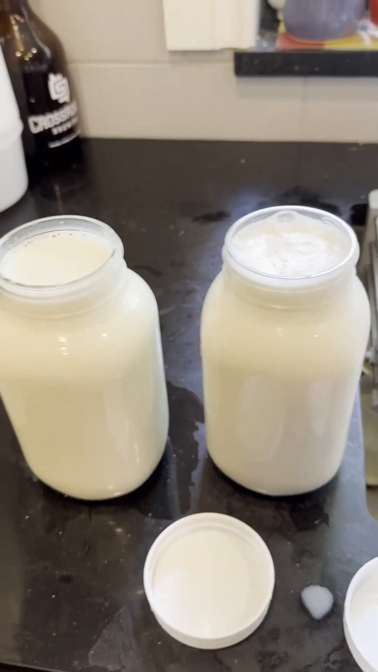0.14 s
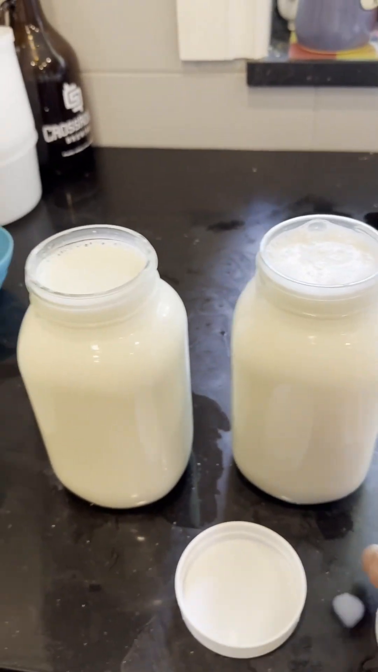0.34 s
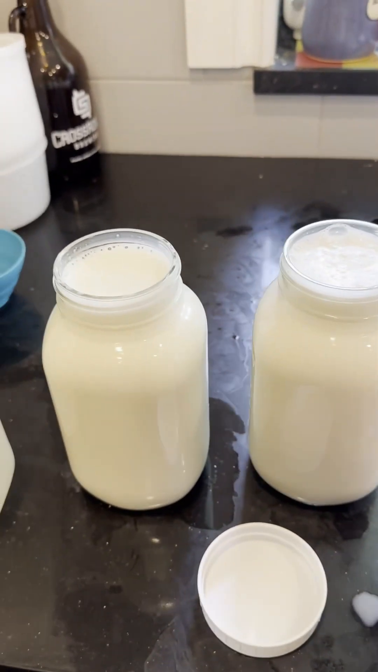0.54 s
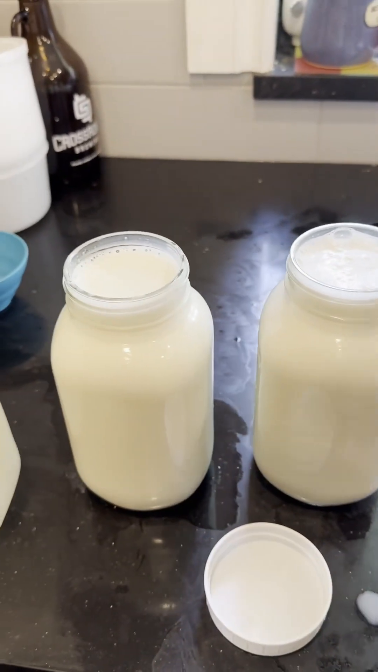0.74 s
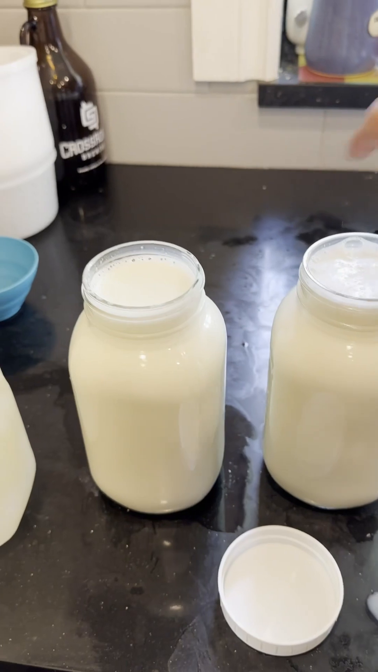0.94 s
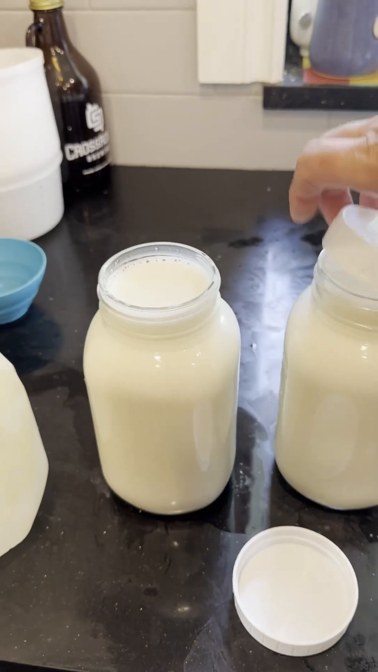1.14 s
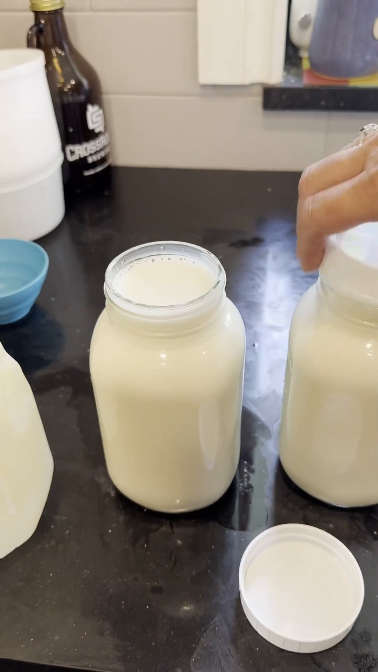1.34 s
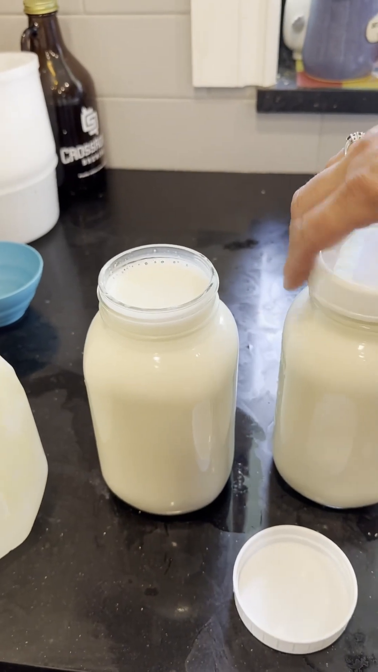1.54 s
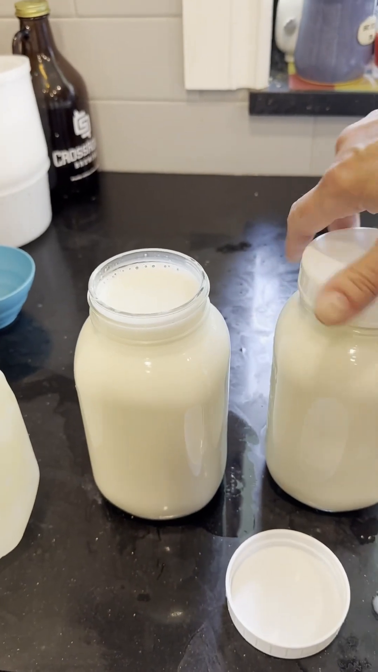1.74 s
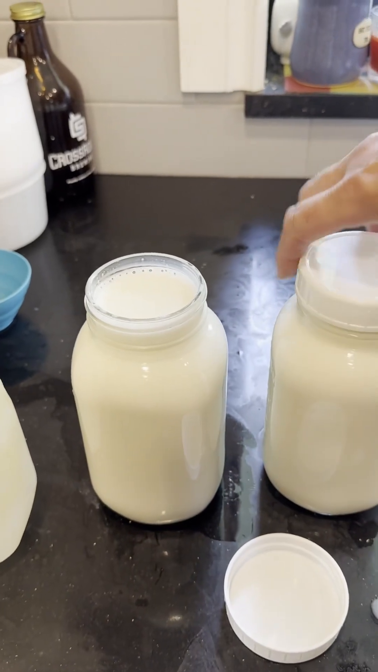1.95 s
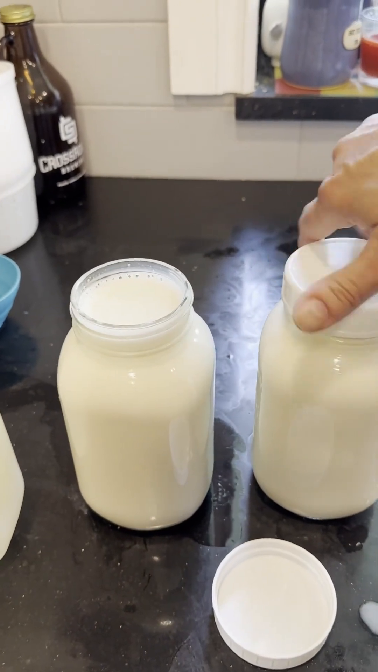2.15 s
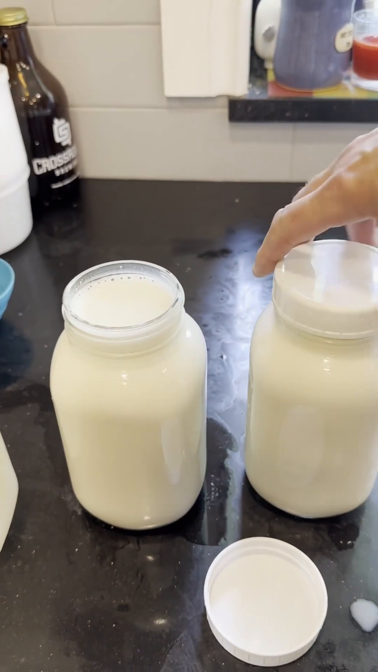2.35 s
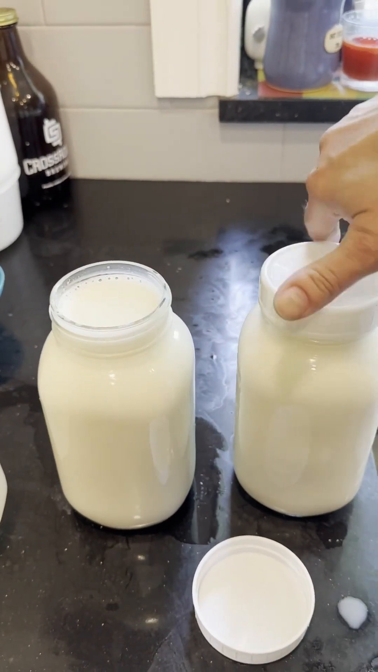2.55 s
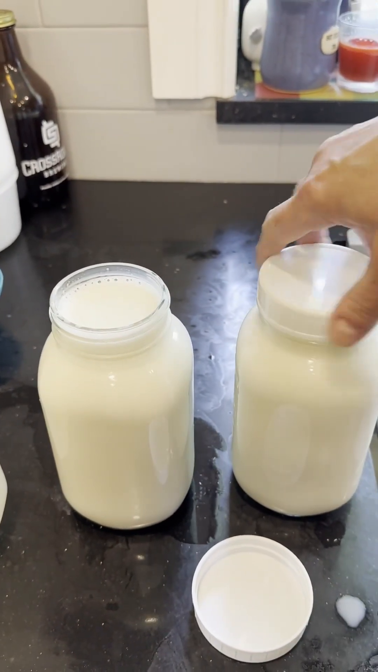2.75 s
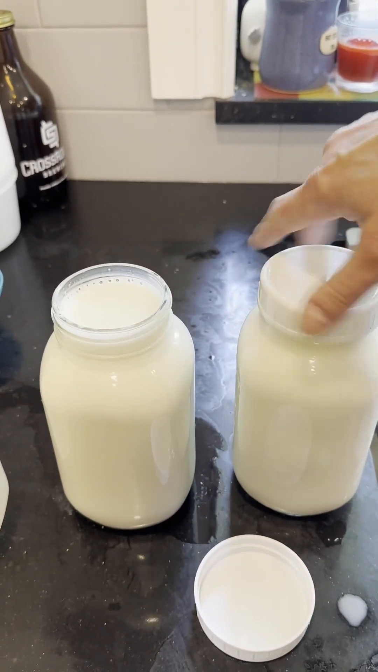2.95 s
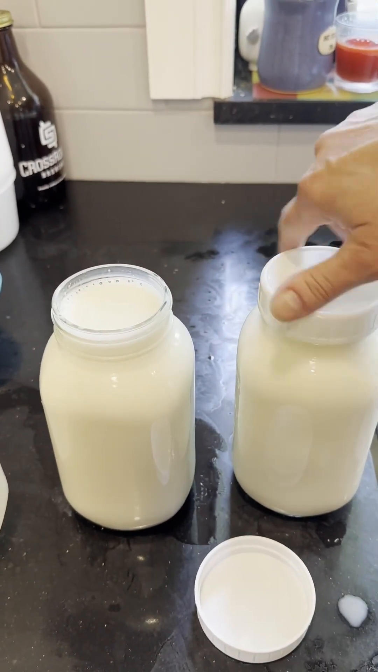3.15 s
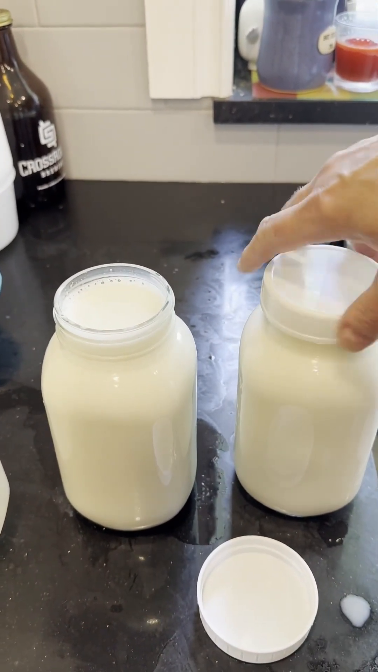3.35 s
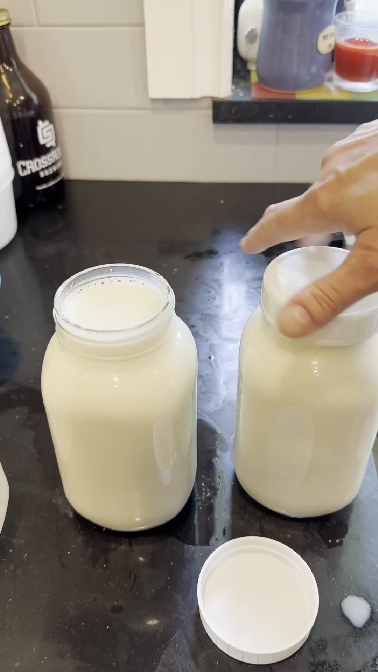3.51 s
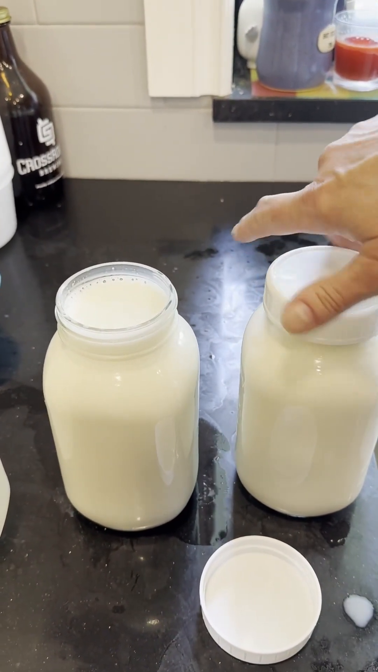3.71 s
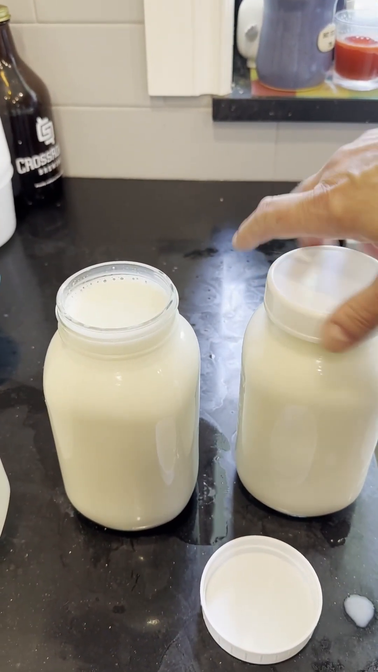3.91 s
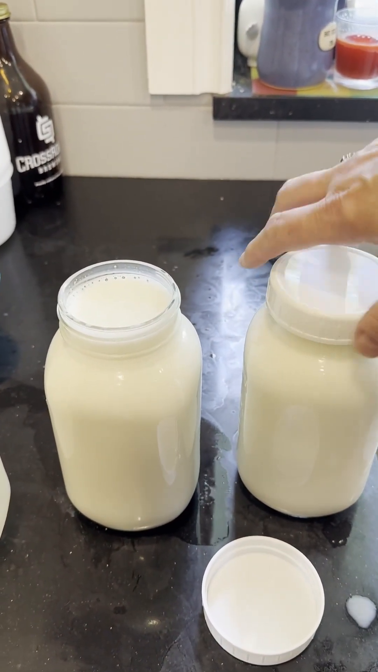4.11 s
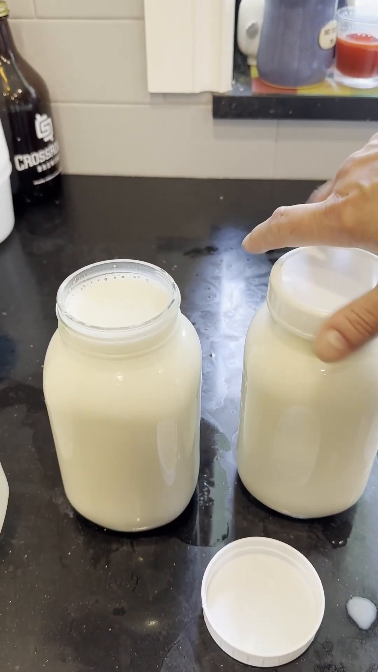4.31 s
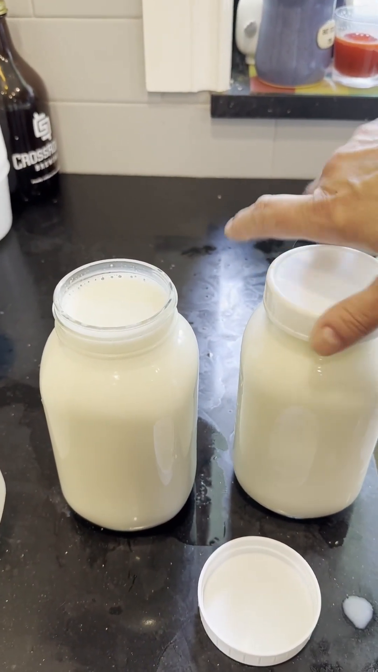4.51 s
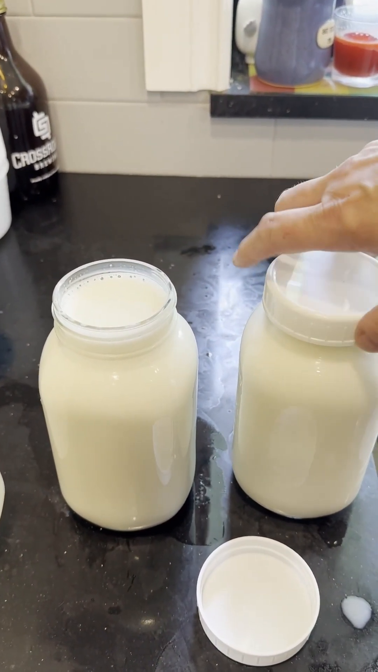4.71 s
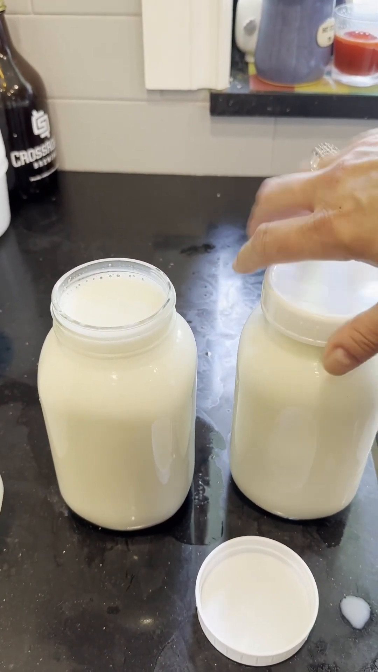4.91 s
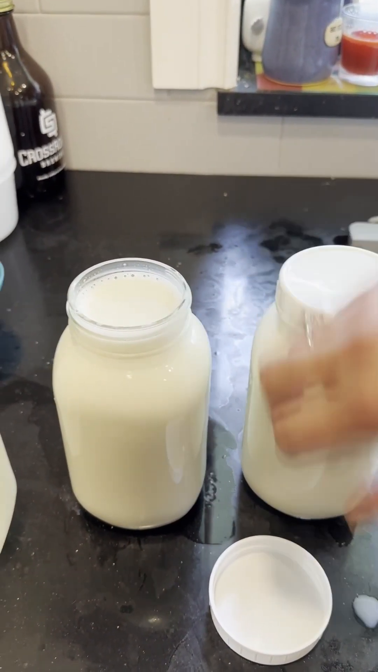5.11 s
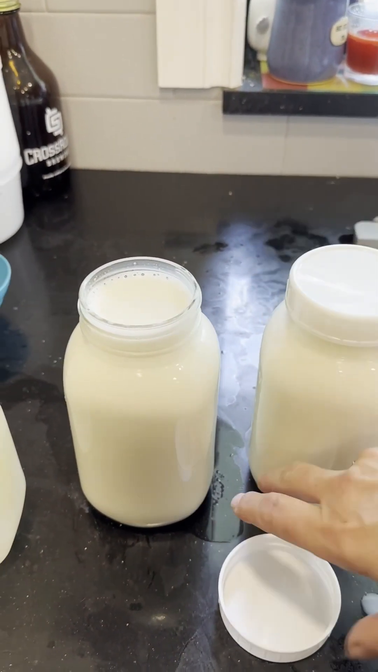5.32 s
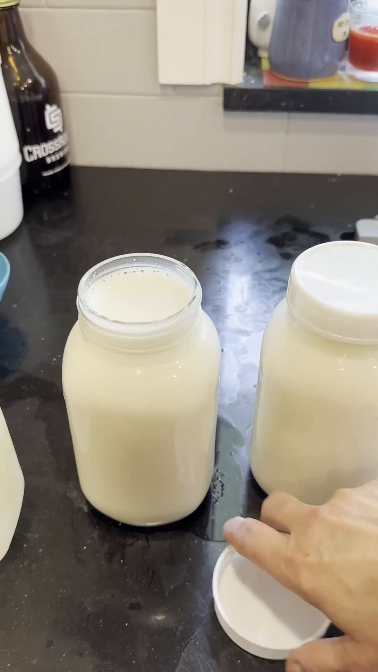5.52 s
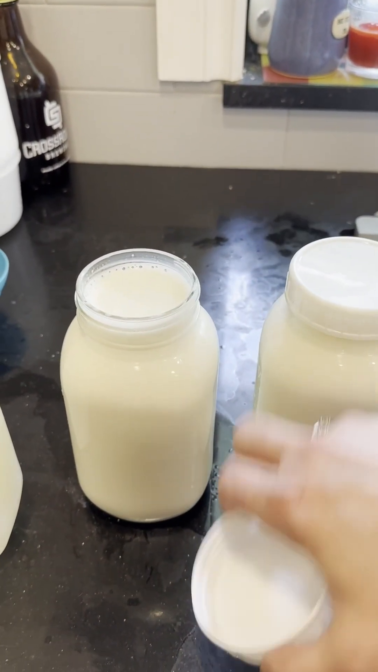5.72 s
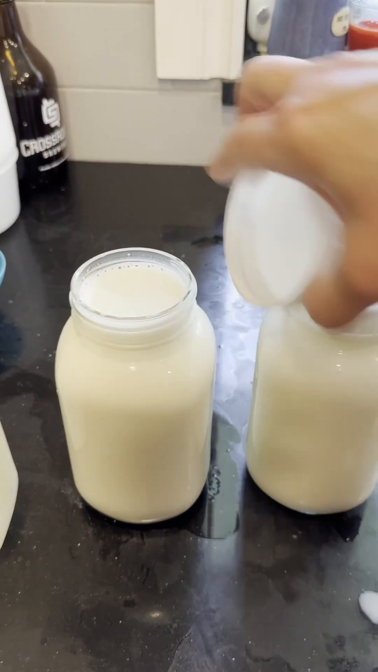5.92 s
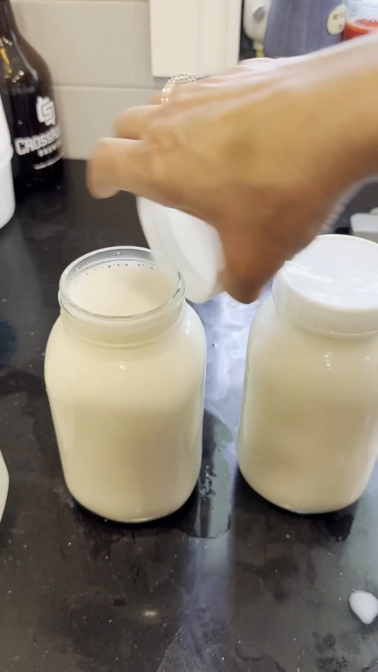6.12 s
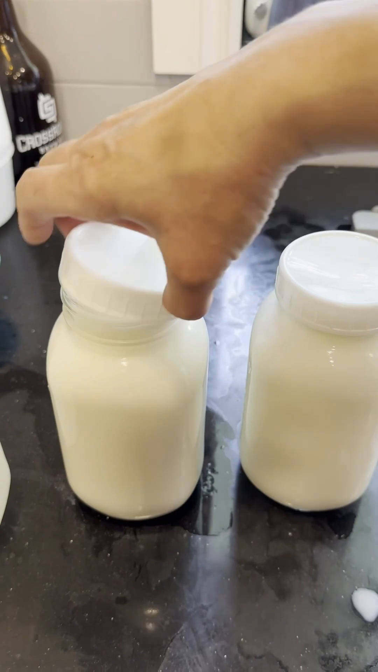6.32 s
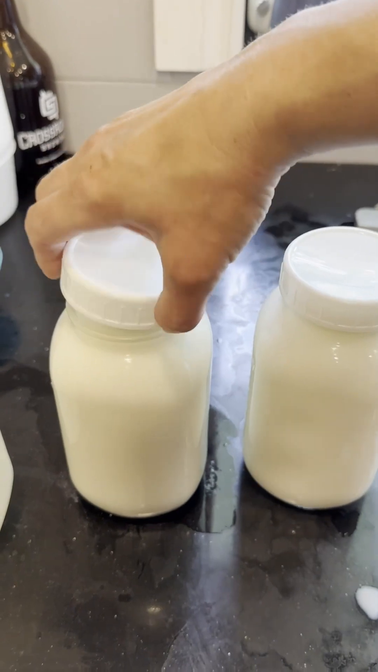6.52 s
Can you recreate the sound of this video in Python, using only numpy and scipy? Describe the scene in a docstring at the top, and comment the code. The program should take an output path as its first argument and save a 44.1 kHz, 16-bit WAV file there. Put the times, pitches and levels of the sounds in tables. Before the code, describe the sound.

Scrape and knock on a stone counter, then plastic lids clatter onto milk-filled glass jars, rasping and clicking along their threads in a small kitchen.

```python
"""Something is shoved across a stone counter and knocks; then a plastic lid drops on a glass jar of milk and skates on its rim.
Short twists screw it down: slipping jerks rasp the thread's resonances, clicks snap, the glass rings and sings.
A second lid knocks and scrapes off the counter, clips the capped jar, lands on the next jar and is turned towards its thread.
Strokes and blows make the full jar hum a low note; all along, a small kitchen with room air, a faint appliance hum
and the thin pulsing whine of electronics."""
import sys
import numpy as np
from scipy import signal
from scipy.fft import rfft, irfft, next_fast_len
from scipy.io import wavfile
from scipy.ndimage import map_coordinates

SR = 44100
rng = np.random.default_rng(int(sys.argv[2]) if len(sys.argv) > 2 else 0)


def store_wav(level_fs):
    """Save 16-bit WAV to argv[1]."""
    pcm = np.round(np.clip(np.atleast_2d(level_fs), -1, 1) * 32767)
    wavfile.write(sys.argv[1], SR, pcm.T.astype(np.int16))


N = 293706
T = np.arange(N) / SR  # time [s]
HALF_S = T[:SR // 2]  # time axis of one struck sound [s]

# Levels in the tables come before the trims in the functions, the room and the microphone.
# Resonances are (frequency [Hz], width [Hz], level [dB]); spectra are (frequency [Hz], level [dB per Hz]);
# glass modes are (frequency [Hz], level [dB], t60 [s]). A swell is the rise over a stroke; negative sinks.

# The hand works the first lid; the last row drags the second off the counter:
# (start [s], length [s], swell [dB], low rasp [dB], high rasp [dB], hiss [dB], jar note [dB])
TWISTS = [(1.383, 0.044, 3, -50, -57, -66.5, -43.5), (1.445, 0.11, 4, -44, -56, -66, -55),
          (1.615, 0.068, 14, -42, -52, -61.5, -44), (1.712, 0.025, 4, -44, -52, -72, -47.5),
          (2.02, 0.085, 16, -37.5, -44.5, -56, -43.5), (2.42, 0.072, 10, -40, -45, -56, -47.5),
          (2.55, 0.12, -3, -61.5, -72.5, -100, -50), (2.725, 0.042, 2.5, -55, -59, -78, -43),
          (2.76, 0.04, -1, -40, -49.5, -65, -50), (2.815, 0.023, 10, -39.5, -42, -59.5, -68),
          (3.075, 0.062, 16.5, -45, -49.5, -57, -45), (3.19, 0.15, -7.5, -64, -82, -100, -53.5),
          (3.4, 0.046, 3, -38, -42.5, -58.5, -55), (3.47, 0.051, -4, -52.5, -62, -87, -45.5),
          (3.675, 0.046, 2, -36.5, -37, -56, -58), (3.928, 0.064, 2, -45.5, -53.5, -58, -46.5),
          (4.221, 0.031, 2, -42.5, -44.5, -62.5, -37), (4.485, 0.041, 6.5, -45.5, -51.5, -56.5, -45.5),
          (4.75, 0.043, 11, -58, -66, -59.5, -49), (5.516, 0.031, 2, -52.5, -66.5, -59.5, -40.5)]
# The second lid seeks its thread: (start [s], length [s], swell [dB], rasp [dB], hiss [dB], jar note [dB])
SETTLE = [(6.369, 0.07, 3, -44, -59, -68), (6.447, 0.03, 2, -60, -68, -82),
          (6.496, 0.018, -4.5, -48, -70.5, -74), (6.533, 0.046, 9, -52, -65, -87),
          (6.638, 0.027, 7.5, -56.5, -79, -29.5)]
# The lid catches and lets go; near 5.5 s the second lid knocks on the counter:
# (time [s], level [dB], knock pitch [Hz], tick [dB relative to the level])
CLICKS = [(1.407, -46, 1000, 5), (1.4349, -22, 730, 0), (1.991, -40, 620, -20), (2.012, -24, 933.6, -18.5),
          (2.405, -24, 560, -6), (2.492, -27, 2450, -13), (2.503, -31, 804, -8), (2.714, -32.5, 553.4, 1.5),
          (2.763, -21, 1018, -16), (3.3995, -18, 1000, -19), (3.695, -24.5, 721, -22),
          (3.729, -27.5, 683.7, -21.5), (3.983, -29, 986, -26), (4.206, -31.5, 743, -8.5),
          (4.210, -30, 344, -34), (4.224, -30.5, 789, -9.5), (4.535, -38, 701, -2),
          (5.513, -42, 706.7, -4.5), (5.528, -34, 856, -9), (6.4355, -23, 717, -7.5)]
# Hollow stick-slip bursts of the lid on the glass: (time [s], length [s], pitch [Hz], level [dB])
JUDDERS = [(1.064, 0.011, 1415, -50), (1.2, 0.0056, 1325, -39.5), (1.207, 0.011, 1256, -41),
           (1.624, 0.054, 700, -43), (1.722, 0.015, 926, -38.5), (2.077, 0.035, 956, -38),
           (2.121, 0.037, 1181, -46.5), (2.834, 0.018, 1330, -41), (3.131, 0.011, 730, -28.5),
           (3.369, 0.01, 997.3, -42), (3.408, 0.01, 954.7, -38), (3.43, 0.039, 675, -43),
           (3.472, 0.0088, 1030, -40), (3.672, 0.017, 757.3, -36), (3.686, 0.044, 1308, -35.5),
           (3.742, .04, 1289, -54.5), (3.959, 0.0067, 766.6, -42.5), (4.202, 0.014, 708, -36),
           (4.485, .01, 1121, -51), (6.366, 0.012, 1062, -40), (6.403, 0.017, 724, -42),
           (6.407, 0.012, 1112, -37), (6.495, 0.017, 704, -41.5), (6.578, 0.014, 703, -39.5)]
# A loose lid hits a jar, a faint tick just ahead of each main blow:
# (time [s], level [dB], knock pitch [Hz], snap [dB], glass ring [dB], thump [dB],
# jar note [dB], which lid, which jar); snap, ring, thump and note are relative to the level
DROPS = [(0.942, -40.5, 1400, 4.5, -16, -16, -34, "first", "open"),
         (0.9504, -8, 1426, -1, -26.5, -33, -24.5, "first", "open"),
         (1.083, -39, 1380, -3.5, -38, -30, -7.5, "first", "open"),
         (1.104, -39.5, 1620, -0.5, -45, -16.5, -9.5, "first", "open"),
         (6.033, -39, 1200, -5, -22, -25, -19, "edge", "capped"),
         (6.042, -12, 1167, -4, -20, -28, -22.5, "edge", "capped"),
         (6.147, -36.5, 2330, 8, -31, -31, -30, "second", "next"),
         (6.1552, -12, 1056, 8, -18.5, -17, -33.5, "second", "next"),
         (6.23, -38.5, 2240, 7, -27.5, -25, -27, "second", "next"),
         (6.24, -36, 1000, 1, -29, -27, -12.5, "second", "next")]
# The loose lid skates on the rim: (start [s], length [s], swell [dB], rattle [dB], jar note [dB])
SKATE = [(1.02, 0.061, 4, -47, -79.5), (1.11, 0.069, 7.5, -53, -53.5), (1.199, 0.013, 0, -52, -49.5),
         (1.235, 0.14, -14.5, -72.5, -62)]
# The second lid's edge drags on the stone: (start [s], length [s], swell [dB], level [dB])
PICKUP = [(5.587, 0.024, 3.5, -51), (5.613, 0.0062, 3, -53)]
# Slides across the counter; last, a faint rub of the lid in the hand:
# (start [s], length [s], swell [dB], rumble [dB], scrape [dB])
SHOVE = [(0, 0.0526, 0.5, -39.5, -53.5), (.055, 0.014, -3, -41, -58), (.106, 0.051, -0.5, -42.5, -44.5),
         (.154, 0.078, -4, -46, -55), (.235, 0.022, 14, -49, -50), (.44, 0.047, -4, -53, -53),
         (.575, 0.067, -5.5, -63.5, -61.5), (.68, 0.234, -1.5, -68, -70), (5.73, 0.18, -0.5, -74, -66)]
# Knocks on the counter: (time [s], thud [dB], clack [dB], crackle [dB])
KNOCKS = [(0.032, -31, -41, -30.5), (0.0548, -27.5, -38.5, -58), (0.108, -56.5, -29.5, -55),
          (0.154, -44, -39, -38), (0.192, -43, -52, -51), (0.240, -49, -64, -34), (0.346, -69, -44, -46),
          (0.3544, -53, -17, -29), (0.442, -57, -43, -44.5)]
# Dull bumps of hands and counter: (start [s], length [s], swell [dB], level [dB])
HANDLING = [(0, 0.22, 10, -39.5), (.3, 0.15, 0, -57.5), (4.945, 0.06, -9, -58.5), (5.53, 0.043, -5, -50)]

# The seated lid and its jar: (frequency [Hz], width [Hz], level [dB])
THREAD_LOW = [(246.8, 20, -1.5), (332.7, 47, 0), (485, 68, 4.5), (696.6, 42.5, 5), (818, 67, -3),
              (939, 80, 4.5), (1107, 164, -3.5)]
# Their upper resonances: (frequency [Hz], width [Hz], level [dB])
THREAD_HIGH = [(1300, 112, 3.5), (1470, 90, 5), (1576, 220, -3.5), (1760, 43, 0.5), (2220, 410, -14.5)]
# The glass singing under the thread: (frequency [Hz], width [Hz], level [dB])
THREAD_GLASS = [(1360, 6.1, 8), (1770, 20, -12), (2503, 26, 2.5), (2770, 23, -25), (3310, 29, -4.5)]
# The second lid on its thread: (frequency [Hz], width [Hz], level [dB])
SEATING = [(474, 160, -2.5), (700, 96, 1), (1083, 89, 1), (2600, 55, -34), (3700, 130, -14)]
# A held lid's plastic snapping: (frequency [Hz], width [Hz], level [dB])
SNAP = [(1445, 470, 14.5), (2480, 250, -22), (5340, 170, 2.5)]
# The first lid, landing: (frequency [Hz], width [Hz], level [dB])
FIRST_LID = [(717, 200, -11.5), (1080, 277, -8.5), (1517, 120, -22), (2593, 28, -10), (3040, 440, -10.5),
             (3740, 230, -8), (4470, 262, -13), (5650, 180, -1.5), (7434, 450, -9.5), (9000, 730, -20)]
# The second lid, landing: (frequency [Hz], width [Hz], level [dB])
SECOND_LID = [(327, 180, -16), (508, 170, -3), (670, 87, 1), (870, 115, -10), (1160, 77, -17),
              (1880, 140, -5), (2260, 590, -5), (2560, 90, 3.5), (3430, 310, 1), (3760, 280, 6.5),
              (4350, 390, -3.5), (5520, 620, -5.5), (7140, 630, -2.5), (9300, 3100, -6)]
# The second lid's edge clipping the capped jar: (frequency [Hz], width [Hz], level [dB])
LID_EDGE = [(560, 200, -18), (1113, 94, -18), (1770, 510, -6), (2500, 270, 3.5), (3420, 81, -16),
            (3850, 370, -20), (5400, 270, -5.5), (5970, 250, -1)]
# The lid held by its rim: (frequency [Hz], width [Hz], level [dB])
FREE_LID = [(997, 180, -4.5), (2644, 230, -2.5), (4970, 793, -13), (8400, 1500, -15)]
# The jar thumping on the counter: (frequency [Hz], width [Hz], level [dB])
THUMP = [(170.4, 30, -0.5), (295, 73, -8), (526, 75, -1.5)]
# A dull blow on the counter: (frequency [Hz], width [Hz], level [dB])
THUD = [(253, 70, 1), (510, 230, -4.5), (802, 64, 9), (1054, 72, 6.5)]
# Broad resonances of the counter: (frequency [Hz], width [Hz], level [dB])
COUNTER = [(690, 380, -6), (1169, 195, 4.5), (1650, 220, -6), (1930, 320, -2.5), (2570, 110, -13),
           (3620, 880, -19), (5800, 320, -12.5), (7400, 600, -44.5)]

# The first jar's glass, open: (frequency [Hz], level [dB], t60 [s])
FIRST_JAR = [(1297, -11, 0.35), (1360, -16, .25), (1714, -8.5, 0.34), (2195, -10.5, .2), (2502, 11, 0.12),
             (2783, -10, .18), (3320, -5.5, 0.22), (3750, -7.5, 0.26), (5200, -15, 0.1744),
             (6226, -19, 0.14), (7400, -12.5, 0.12)]
# The glass with a lid pressed on it: (frequency [Hz], level [dB], t60 [s])
CAPPED_JAR = [(1040, -3, 0.26), (1405, -17, 0.3), (1710, -9, 0.15), (2535, -3, 0.076), (3327, -8, 0.21),
              (3680, -8, 0.12)]
# The glass with its lid screwed tight and the hand off: (frequency [Hz], level [dB], t60 [s])
TIGHT_JAR = [(1051, -7, 0.26), (1910, -14, 0.29), (2530, -11, 0.19), (3310, -4, 0.16), (5500, -27, 0.14)]
# The next jar's glass, open: (frequency [Hz], level [dB], t60 [s])
SECOND_JAR = [(1050, -23, 0.24), (1780, -9, 0.4), (2500, -21, .25), (2870, -5, 0.093), (3338, -15, 0.26),
              (3630, -12, 0.22), (3680, -5.5, 0.16), (4000, -15, 0.16), (4400, -10, .12), (5420, -13, 0.2),
              (7400, -8.5, 0.25)]
# The next jar's glass under the second lid: (frequency [Hz], level [dB], t60 [s])
SEATED_JAR = [(2630, -11, 0.086), (3310, -5, 0.078), (3900, 8.5, 0.074)]

# How freely the glass sings: up as the thread bites, down as the lid tightens, then partly back:
# (time [s], level [dB])
SINGING = [(1.6, -17.5), (2.2, -10), (2.6, -9.5), (3.7, -24), (4.3, -16)]
# The skating lid's ring wavers, then sinks as it comes to lie flat: (time [s], pitch [Hz])
RIM_PITCH = [(1.1, 1370), (1.21, 1300), (1.26, 1380), (1.32, 1130)]
# The second lid's ring sinks as it finds its thread: (time [s], pitch [Hz])
SEAT_PITCH = [(6.37, 1090), (6.415, 1020), (6.435, 790), (6.5, 720)]

# Hiss of the rubbing lids: (frequency [Hz], level [dB per Hz])
HISS = [(1500, -5), (3000, -10.5), (4200, -14.5), (4950, -14.5), (5700, -12), (8000, -10), (10000, -11.5),
        (11000, -3.5), (13000, -55)]
# Hard surfaces meeting: (frequency [Hz], level [dB per Hz])
CRACK = [(200, -6), (1000, 1), (4000, -5.5), (4950, -12), (5700, -6), (8000, -5.5), (10500, -6),
         (12500, -11), (16000, -27)]
# A landing lid buzzing on the glass: (frequency [Hz], level [dB per Hz])
CLATTER = [(300, -14), (700, -1.5), (1300, 3.5), (2100, -7), (4000, 3), (5000, -9), (6000, -12),
           (9000, -18.5), (12000, -43)]
# The jar rocking on the counter: (frequency [Hz], level [dB per Hz])
ROCK = [(25, -28.5), (55, -4.5), (110, -11.5), (175, 0), (300, -3.5), (450, -61)]
# Rumble of the slides: (frequency [Hz], level [dB per Hz])
SLIDE = [(24, -48), (40, -40), (118, -15.5), (191, -14.5), (242, 0.5), (300, -8), (360, -9.5), (480, -5),
         (851, -6.5), (937, -20.5), (1080, -7.5), (1800, -37), (2340, -54), (3960, -120)]
# Scrape of the slides: (frequency [Hz], level [dB per Hz])
SCRAPE = [(700, -14), (1400, -1.5), (2700, -4), (4000, -13), (4950, -13.5), (5700, -11), (8000, -10),
          (10000, -7.5), (11500, -5.5), (13000, -68)]
# Handling bumps: (frequency [Hz], level [dB per Hz])
BUMPS = [(20, -32.5), (35, -14), (50, 4.5), (90, -4), (140, 1), (200, -7), (350, -51.5)]
# Room air: (frequency [Hz], level [dB per Hz])
AIR = [(18, -38.5), (30, -13), (49, 3), (124, -6), (237, -3), (600, -12.5), (720, -24), (1050, -17.5),
       (1390, -17), (1870, -15.5), (4930, -19.5), (5730, -15.5), (10700, -23), (11500, -49), (13000, -54),
       (15500, -24.5), (22000, -120)]

# Partials of the appliance hum: (frequency [Hz], level [dB])
HUM = [(118, -93), (237, -78.5), (1814, -92)]
# Decay of the kitchen's tail: (frequency [Hz], t60 [s])
KITCHEN = [(200, 0.6), (530, 0.256), (1400, 0.22), (3700, 0.31), (9700, 0.24), (12500, 0.039)]
# Stereo balance: (frequency [Hz], left minus right [dB])
BALANCE = [(60, -10), (290, 1.5), (640, -3.5), (1410, -1.5), (1900, 1.5), (2500, -3), (3300, 0.5),
           (6820, 0.0), (15000, 0)]
# Stereo phase: (frequency [Hz], lead of the left [rad])
LEAD = [(500, 0.5), (1400, 0.43), (2600, 0.5), (3700, 1), (6000, 0), (7500, -0.04), (10000, -2.5),
        (11000, -3), (15000, -3)]

# how fast each kind of stroke dies away as the hand stops [dB/s]
TWIST_FALL, LOOSE_FALL, SHOVE_FALL, BUMP_FALL = 420.5, 802, 265, 171
LOOSE_SLIPS = 600  # slips a second of a loose lid


def amp(db):
    """Decibels to gain."""
    return 10 ** (np.asarray(db) / 20)


def unit(x):
    """Scale to rms 1."""
    return x / np.sqrt(np.mean(x ** 2) + 1e-20)


def along(points, hz):
    """Read (Hz, value) points on a log frequency axis."""
    f, v = np.transpose(points)
    return np.interp(np.log(hz + 1), np.log(f + 1), v)


def wobble(rate):
    """A smooth random curve with rate knots a second."""
    return map_coordinates(rng.standard_normal(int(N * rate / SR) + 4), [T * rate])


def filtered(x, response):
    """Apply a frequency response."""
    m = next_fast_len(x.shape[-1] + 8192)
    return irfft(rfft(x, m) * response(np.fft.rfftfreq(m, 1 / SR)), m)[..., :x.shape[-1]]


def coloured(x, spectrum):
    """Shape x by a smooth spectrum, at rms 1."""
    return unit(filtered(x, lambda hz: amp(along(spectrum, hz))))


def noise(spectrum, size=N):
    """Coloured noise of rms 1."""
    return coloured(rng.standard_normal(size), spectrum)


def add(track, s, sound):
    """Mix a sound in at s seconds."""
    part = track[round(s * SR):][:len(sound)]
    part += sound[:len(part)]


def strokes(rows, fall_db_per_s):
    """A stroke grips, swells to its level and dies away: one gain track for each level column."""
    t = T[:SR]
    tracks = np.zeros((len(rows[0]) - 3, N))
    for start, length, swell_db, *levels in rows:
        grip = np.minimum(t / 0.004, 1)  # takes hold within 4 ms
        swell = swell_db * (np.minimum(t / length, 1) - 1)
        fall = fall_db_per_s * np.maximum(t - length, 0)
        shape = grip * amp(swell - fall)
        for track, db in zip(tracks, levels):
            add(track, start, amp(db) * shape)
    return tracks


def slips(rate, spread_db):
    """Stick and slip: jerks of either sign at uneven intervals, rate a second, uneven in strength."""
    travel = np.cumsum(np.broadcast_to(rate, N)) / SR
    catches = np.cumsum(rng.uniform(.1, 1.9, 2 * int(travel[-1]) + 20))
    at = np.searchsorted(travel, catches[catches < travel[-1]])
    jerks = np.bincount(at, minlength=N) * rng.choice([-1, 1], N)
    strength = amp(spread_db * np.clip(wobble(260), -2, 2))
    return unit(jerks / np.sqrt(rate) * strength)  # denser jerks are weaker, so the power stays even


def rub(force):
    """A hard twist slips hundreds of times a second; a light one breaks up into single ticks."""
    light, added_when_hard, hard_db = 80, 600, -38  # slips/s, slips/s, force of a hard twist
    return slips(rate=light + added_when_hard * force / amp(hard_db), spread_db=3.5)


def struck(resonances):
    """Impulse response of a damped body, peak 1: a wider resonance dies sooner."""
    body = np.zeros(len(HALF_S))
    for k, (hz, width, db) in enumerate(resonances):
        decay = np.exp(-np.pi * width * HALF_S)
        body += (-1) ** k * amp(db) * width * decay * np.sin(2 * np.pi * hz * HALF_S)
    return body / np.abs(body).max()


def rasp(jerks, resonances):
    """Jerks ring the resonances of lid and jar, which sound on after the hand stops."""
    body = struck(resonances)
    return signal.fftconvolve(jerks, body / np.linalg.norm(body))[:N]


def gripped(jerks, resonances):
    """As the grip shifts, the rasp passes between slightly flat and slightly sharp resonances."""
    turn = np.pi / 4 * (1 + np.tanh(2 * wobble(14)))
    flat, sharp = (np.array(resonances) * [ratio, 1, 1] for ratio in (0.988, 1.012))
    return rasp(np.cos(turn) ** 2 * jerks, flat) + rasp(np.sin(turn) ** 2 * jerks, sharp)


def gliding(jerks, pitch, width_hz):
    """Jerks softly ring one resonance of moving pitch; each ring swells before it dies."""
    t = T[:SR // 10]
    ring = t * np.exp(-np.pi * width_hz * t)
    turn = np.exp(2j * np.pi * np.cumsum(np.interp(T, *np.transpose(pitch))) / SR)
    # shift the moving pitch down to zero, ring there, shift back up
    rung = signal.fftconvolve(jerks / turn, ring / np.linalg.norm(ring))[:N]
    return np.sqrt(2) * np.real(turn * rung)


def knock(hz, cycles):
    """A heavily damped push of the lid, 60 dB down after the given number of cycles."""
    onset = 1 - np.exp(-HALF_S / 0.00052)
    return np.sin(2 * np.pi * hz * HALF_S) * amp(-60 * HALF_S * hz / cycles) * onset


def crack(t60):
    """The short bright noise of hard surfaces meeting."""
    return noise(CRACK, size=len(HALF_S)) * amp(-60 * HALF_S / t60)


def glass(modes):
    """The jar is never quite round, so each mode is a beating pair; the milk inside makes it waver."""
    ring = np.zeros(len(HALF_S))
    depth, pace = 0.51, 70  # wavering [rad], [knots/s]
    for hz, db, t60 in modes:
        apart = rng.uniform(8, 22)  # spacing of the pair [Hz]
        waver = map_coordinates(rng.standard_normal(pace + 4), [HALF_S * pace])
        phase = 2 * np.pi * hz * HALF_S + depth * waver
        pair = np.sin(phase) + amp(-10.5) * np.sin(phase + 2 * np.pi * apart * HALF_S)
        ring += amp(db - 60 * HALF_S / t60) * pair
    return ring


def singing_db(s):
    """How freely the glass answers the lid at that moment."""
    return np.interp(s, *np.transpose(SINGING))


def rubbing_hiss(level):
    """Slips too dense to tell apart hiss under the strokes."""
    return amp(4.0) * level * coloured(slips(rate=7500, spread_db=3), HISS)


def twisting():
    """The first lid rasps, hisses and makes the glass sing under each twist; last, the second scrapes off the counter."""
    low, high, hiss, _ = strokes(TWISTS, TWIST_FALL)
    jerks = rub(low + high)
    low_rasp = gripped(amp(-3) * low * jerks, THREAD_LOW)
    high_rasp = rasp(amp(-3.0) * high * jerks, THREAD_HIGH)
    singing = rasp(amp(singing_db(T)) * high * jerks, THREAD_GLASS)
    return low_rasp + high_rasp + singing + rubbing_hiss(hiss)


def settling():
    """The second lid, still loose, chatters more hollowly, one ring sinking as it finds its thread."""
    force, hiss, _ = strokes(SETTLE, LOOSE_FALL)
    chatter = force * slips(rate=LOOSE_SLIPS, spread_db=3.0)
    sinking_ring = gliding(amp(-10) * chatter, SEAT_PITCH, width_hz=170)
    return sinking_ring + rasp(amp(-6) * chatter, SEATING) + rubbing_hiss(hiss)


def clicks():
    """A catching or knocking lid gives a dull knock, a short ring and a snap; on a jar the snap rings the glass."""
    track = np.zeros(N)
    body = struck(THREAD_LOW) + amp(-7.0) * struck(THREAD_HIGH)
    for s, db, hz, tick_db in CLICKS:
        # first lid on its jar until 5 s, second lid on the next from 6 s; between, it knocks on the counter
        modes = CAPPED_JAR if s < 5 else SEATED_JAR if s > 6 else []
        ring = amp(-7 + singing_db(s)) * glass(modes)
        tick = amp(-9.5) * crack(t60=0.016) + amp(-1) * struck(SNAP) + ring
        click = knock(hz, cycles=11.9) + amp(-11.5) * body + amp(tick_db) * tick
        add(track, s, amp(db) * click)
    return track


def judders():
    """The lid sticks and slips near its own resonance: a gritty burst of uneven cycles."""
    track = np.zeros(N)
    waver = 0.85 * wobble(520)  # [rad]
    grit = amp(3.2 * wobble(520))
    for s, length, hz, db in JUDDERS:
        now = (T >= s) & (T < s + length)
        t = T[now] - s
        swell = np.sin(np.pi * t / length)
        track[now] += amp(db) * swell * grit[now] * np.sin(2 * np.pi * hz * t + waver[now])
    return track


def drops():
    """A landing lid knocks, snaps and buzzes on the rim; the glass rings and the jar thumps on the counter."""
    lids = {"first": FIRST_LID, "second": SECOND_LID, "edge": LID_EDGE}
    jars = {"open": FIRST_JAR, "capped": TIGHT_JAR, "next": SECOND_JAR}
    track = np.zeros(N)
    for s, db, hz, snap_db, ring_db, thump_db, _, lid, jar in DROPS:
        snap = struck(lids[lid]) + amp(-13) * crack(t60=0.025)
        chatter = coloured(slips(rate=1600, spread_db=-1.0)[:len(HALF_S)], CLATTER)
        buzz = chatter * amp(-22 - 60 * HALF_S / 0.1)  # t60 of 0.1 s
        blow = knock(hz, cycles=17.9) + amp(snap_db) * snap + buzz
        blow += amp(ring_db) * glass(jars[jar]) + amp(thump_db) * struck(THUMP)
        add(track, s, amp(db) * blow)
    return track


def skating():
    """The loose lid skates on the rim; its broad ring wavers, then sinks in pitch until it lies flat."""
    force, _ = strokes(SKATE, LOOSE_FALL)
    jerks = slips(rate=LOOSE_SLIPS, spread_db=5.0)
    return gliding(amp(-3.0) * force * jerks, RIM_PITCH, width_hz=510)


def pickup():
    """Lifted off the counter, the second lid scrapes on its edge and rings thinly."""
    force, = strokes(PICKUP, LOOSE_FALL)
    return rasp(force * slips(rate=800, spread_db=-4.5), FREE_LID)


def boom():
    """Lid strokes and blows drive the heavy, milk-filled jar: one low note, a little late, and a dull rocking."""
    drive = strokes(TWISTS, TWIST_FALL)[-1] + strokes(SETTLE, LOOSE_FALL)[-1] + strokes(SKATE, LOOSE_FALL)[-1]
    blow = np.exp(-HALF_S / 0.033)  # a blow's push fades with this time constant [s]
    for s, db, *_, note_db, lid, jar in DROPS:
        add(drive, s, amp(db + note_db) * blow)
    for s, db, *_ in CLICKS:
        add(drive, s, amp(db - 24.5) * blow)
    keep = np.exp(-1 / (0.016 * SR))  # two 16 ms lags: the note builds and fades slowly
    level = signal.lfilter([(1 - keep) ** 2], np.poly([keep, keep]), drive)
    note = unit(np.sin(2 * np.pi * 230 * T + 0.55 * wobble(20)))
    return level * (amp(-4.5) * note + amp(-14) * noise(ROCK))


def counter():
    """Something judders across the stone, catching and knocking; much later a lid rubs faintly in the hand."""
    rumble, scrape = strokes(SHOVE, SHOVE_FALL)
    track = amp(-2.5) * rumble * coloured(slips(rate=540, spread_db=4), SLIDE)
    track += amp(-1.5) * scrape * coloured(slips(rate=1200, spread_db=5.0), SCRAPE)
    for s, thud_db, clack_db, crackle_db in KNOCKS:
        crackle = amp(crackle_db) * crack(t60=0.046) / 2
        add(track, s, amp(thud_db) * struck(THUD) + amp(clack_db) * struck(COUNTER) + crackle)
    return track


def radiated(x, corner_hz):
    """Small things radiate little bass: a second-order high-pass."""
    return filtered(x, lambda hz: (1j * hz) ** 2 / (corner_hz ** 2 - hz ** 2 + 1j * np.sqrt(2) * corner_hz * hz))


def placed(x):
    """Short waves reach the two microphones at different strengths and phases; long waves reach both alike."""
    half = np.array([[1], [-1]]) / 2  # left takes half of each difference, right the opposite half

    def response(hz):
        share = half * np.clip((hz - 200) / 300, 0, 1)
        return amp(share * along(BALANCE, hz)) * np.exp(1j * share * along(LEAD, hz))
    return filtered(x, response)


def kitchen(x, side_db):
    """Tiles and cupboards answer with a short tail of decaying noise, partly shared by both microphones."""
    hz, t, z = signal.stft(rng.standard_normal((2, SR // 2)), SR, nperseg=256)
    decay = amp(-60 * t / along(KITCHEN, hz)[:, None]) * (1 - np.exp(-t / 0.00064))
    tails = signal.istft(z * decay, SR, nperseg=256)[1]
    mid, side = signal.fftconvolve(x[None], tails / np.linalg.norm(tails[0]), axes=1)[:, :N]
    return np.array([mid + amp(side_db) * side, mid - amp(side_db) * side])


def background():
    """Room air, an appliance's hum, the thin pulsing whine of electronics and dull handling bumps."""
    hum = sum(amp(db) * unit(np.sin(2 * np.pi * hz * T + 0.67 * wobble(3.7))) for hz, db in HUM)
    pulsing = np.abs(np.sin(np.pi * 30 * T)) ** 10 * amp(3 * wobble(3))  # 30 pulses a second
    whine = amp(-76.0) * unit(pulsing * np.sin(2 * np.pi * 7660 * T + wobble(410)))
    bumps = amp(-6.5) * strokes(HANDLING, BUMP_FALL)[0] * noise(BUMPS)
    mid = amp(-64.5) * noise(AIR) + hum + whine + bumps
    side = amp(-69.5) * filtered(noise(AIR), lambda hz: hz / (hz + 500))  # the bass is shared by both sides
    return np.array([mid + side, mid - side])


def scene():
    """Jars and counter close by, the room around them."""
    taps = radiated(drops(), corner_hz=169.3)
    rubs = radiated(twisting() + settling() + clicks() + judders() + skating() + pickup(), corner_hz=110)
    shove = counter()
    room = kitchen(amp(-14.0) * taps + amp(-12.0) * rubs + amp(-8.5) * shove, side_db=-8)
    return placed(taps + rubs + shove + room) + boom() + background()


def record(dry):
    """The microphone sheds the deepest bass, dips near 5 and 11.5 kHz and stops at 15.9 kHz."""
    response = [(20, -22.0), (45, 1.5), (4600, -1.0), (4950, -7.0), (5300, 1.0),
                (10200, -4.5), (11500, -9.5), (15900, -1.5)]  # (frequency [Hz], level [dB])
    return filtered(dry, lambda hz: amp(along(response, hz)) * (hz < 15900))


dry = scene()
out = record(dry)
store_wav(out)
```